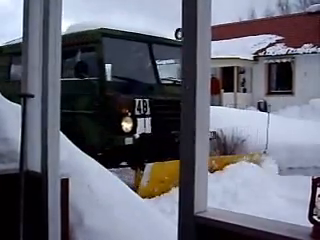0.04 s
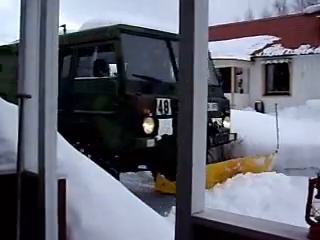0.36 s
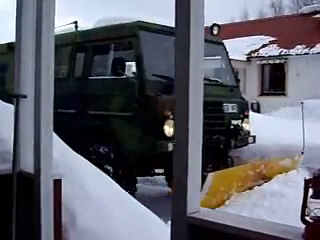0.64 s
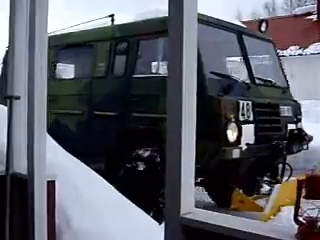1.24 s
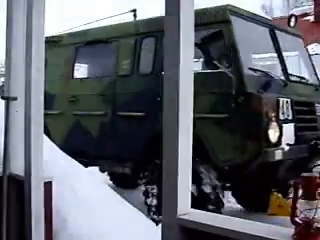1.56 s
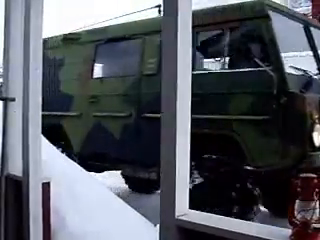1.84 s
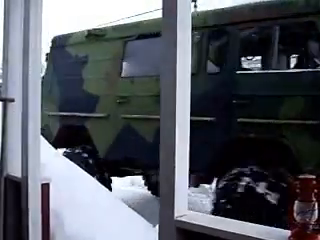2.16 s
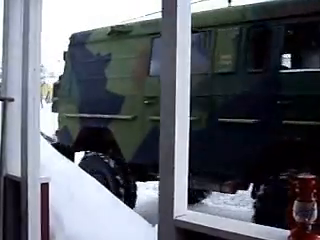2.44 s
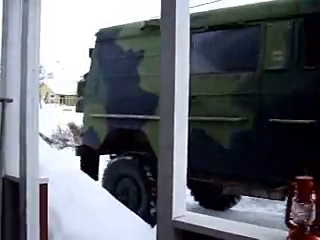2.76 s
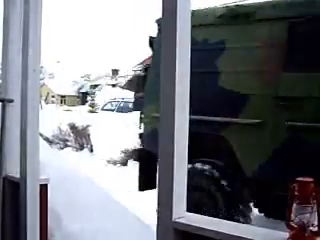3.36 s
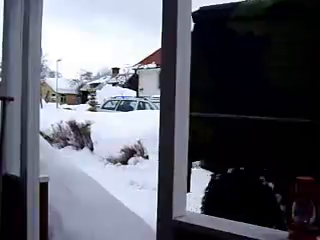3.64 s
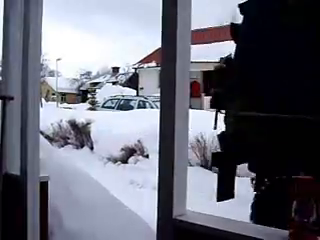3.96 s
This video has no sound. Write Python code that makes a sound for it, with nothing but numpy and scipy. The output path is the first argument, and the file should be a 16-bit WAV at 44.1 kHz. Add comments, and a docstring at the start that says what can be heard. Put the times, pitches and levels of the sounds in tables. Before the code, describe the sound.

A heavy truck plows past at walking pace, heard from a porch. Its steel blade scrapes, clanks and thumps over packed snow, then fades as the engine revs slightly and the exhaust drone grows, with light crunching.

```python
"""A steel blade judders and scrapes over packed snow, above the drone of a six-cylinder truck.
The truck ploughs past a porch at walking pace, revving up a little. The edge sticks and slips,
ringing the steel and jolting the chassis; snow and frozen lumps crunch under the tyres.
Then the blade moves away and the exhaust drone comes round.
A small camera with a low sample rate and a treble notch takes it in."""
import sys
import numpy as np
from scipy import signal
from scipy.fft import rfft, irfft
from scipy.io import wavfile
from scipy.ndimage import uniform_filter1d

SR = 44100
rng = np.random.default_rng(int(sys.argv[2]) if len(sys.argv) > 2 else 0)


def store_pcm(level_fs):
    """Save levels as 16-bit WAV."""
    pcm = np.round(np.clip(level_fs, -1, 1) * 32767).astype(np.int16)
    wavfile.write(sys.argv[1], SR, np.atleast_2d(pcm).T)


N = 176400
TIME_S = np.arange(N) / SR
FREQ_HZ = np.fft.rfftfreq(N, 1 / SR)
BURST_ATTACK_S, BURST_DECAY_S = 0.006, 0.018  # steel clashes and lumps


def undb(db):
    return 10 ** (np.asarray(db) / 20)


def unit(x):
    """Scale to rms 1."""
    return x / np.sqrt(np.mean(x ** 2))


def curve(table, column=1):
    """One table column, linear in time between rows."""
    rows = np.array(table, float)
    return np.interp(TIME_S, rows[:, 0], rows[:, column])


def colour(x, points):
    """Filter by (freq_hz, gain_db) points, falling off beyond both ends."""
    hz, db = np.array(points, float).T
    f = np.maximum(FREQ_HZ, 1)
    skirts = np.minimum(f / hz[0], 1) ** 2 * np.minimum(hz[-1] / f, 1) ** 2
    return irfft(rfft(x) * undb(np.interp(np.log(f), np.log(hz), db)) * skirts, N)


def resonance(x, hz, width_hz):
    """Band about hz, rms 1."""
    f = np.maximum(FREQ_HZ, 1)
    return unit(irfft(rfft(x) / (1 + 1j * (f / hz - hz / f) * hz / width_hz) ** 2, N))


def lowpass(x, hz):
    return signal.sosfilt(signal.ellip(8, 0.2, 70, hz, fs=SR, output="sos"), x)


def highpass(x, hz):
    return signal.sosfilt(signal.butter(2, hz, "high", fs=SR, output="sos"), x)


def wander(rate_hz):
    """Smooth random drift, rms 1."""
    hold = max(int(SR / rate_hz), 1)
    steps = np.repeat(rng.standard_normal(N // hold + 1), hold)
    return unit(uniform_filter1d(uniform_filter1d(steps, hold), hold)[:N])


def grains(per_s, spread_db=3):
    """Tiny fractures of random time, sign and size."""
    impulses = (rng.random(N) < per_s / SR) * rng.choice([-1, 1], N)
    return impulses * undb(spread_db * rng.standard_normal(N))


def porch(x, t60_s=0.078, tail_db=-13.0, delay_s=0.003):
    """Close wooden walls add a short tail."""
    t = TIME_S[:SR // 5]
    tail = rng.standard_normal(len(t)) * np.exp(-np.log(1000) * t / t60_s) * (t > delay_s)
    return x + undb(tail_db) * signal.fftconvolve(highpass(x, 600), tail / np.linalg.norm(tail))[:N]


def tyres():
    """Packed snow crunches under the tread."""
    # crunch spectrum: freq_hz, gain_db
    spectrum = [(800, -5), (2000, -37), (4300, 0), (5900, -13.5)]
    # crunch envelope: time_s, level_db
    levels = [(0, -36), (1.2, -67), (1.7, -40), (2.7, -39), (3.3, -38), (4, -42.5)]
    return unit(colour(grains(per_s=2300, spread_db=5.5), spectrum)) * undb(curve(levels))


def frozen_lumps():
    """Lumps give way under blade and wheels, each a burst of pitched grit."""
    # crushed lumps: start_s, length_s, centre_hz, level_db
    bursts = [(0.078, 0.038, 2560, -22.5), (0.563, 0.013, 2220, -24), (1.616, 0.18, 2130, -29),
              (1.711, 0.073, 1660, -26), (2.702, 0.016, 4170, -28.5), (2.738, 0.014, 2097, -26),
              (3.092, 0.0092, 2423, -26)]
    out = np.zeros(N)
    for start_s, length_s, centre_hz, level_db in bursts:
        age_s = np.maximum(TIME_S - start_s, 0)
        attack = np.minimum(age_s / BURST_ATTACK_S, 1)
        release = np.exp(-np.maximum(age_s - length_s, 0) / BURST_DECAY_S)
        grit = resonance(grains(per_s=1500), centre_hz, width_hz=0.25 * centre_hz)
        out += undb(level_db) * attack * release * grit
    return out


def body_rumble():
    """The heavy body shakes on rutted snow."""
    # body and road spectrum: freq_hz, gain_db
    spectrum = [(12, 10), (22, -39), (27, 8.5), (35, -1.5), (48, -6.5), (75, -4), (120, -3.5), (170, -4),
                (240, -12), (330, -16), (600, -65)]
    # rumble envelope: time_s, level_db
    levels = [(0, -18.5), (.25, -17), (.47, -20), (.68, -18.5), (1.75, -19.5), (2.25, -26), (2.45, -15.5),
              (2.95, -24.5), (3.25, -19), (3.45, -24), (3.58, -17.5), (3.95, -31)]
    return unit(colour(rng.standard_normal(N), spectrum)) * undb(curve(levels))


def machine_noise(firings, level_db=-28.5, pulse_depth=0.12):
    """Fan, valves and gas rush, pulsing with each firing."""
    # machine spectrum: freq_hz, gain_db
    spectrum = [(250, -9), (380, -6), (550, -1.5), (800, -11), (1200, -10), (2000, -10.5), (2800, -14),
                (4200, -14.5), (5900, -23)]
    rush = rng.standard_normal(N) * (1 + pulse_depth * np.cos(2 * np.pi * firings))
    return undb(level_db) * unit(colour(rush, spectrum))


def pipe_growl(firings, jitter_cycles=0.11, scatter_db=2.5, surge_db=2.5):
    """One uneven puff per firing rings the exhaust pipe; each resonance surges on its own."""
    # pipe resonances: centre_hz, gain_db
    modes = [(455, -5), (535, 0.5), (605, -4), (780, -7)]
    # growl envelope: time_s, level_db
    levels = [(0, -40.5), (2.3, -29.5), (2.5, -25), (2.9, -33.5), (3.35, -26), (3.47, -25.5), (3.72, -25.5),
              (4, -30.5)]
    count = np.floor(firings + jitter_cycles * wander(100))
    puffs = np.diff(count, prepend=count[0]) * undb(scatter_db * wander(100))
    pipe = sum(undb(db + surge_db * wander(18)) * resonance(puffs, hz, width_hz=64) for hz, db in modes)
    return undb(curve(levels)) * unit(pipe)


def exhaust_tone(cycles, waver_db=3.5):
    """Sine locked to the engine, wavering about rms 1."""
    return np.sqrt(2) * np.sin(2 * np.pi * (cycles + rng.random())) * undb(waver_db * wander(14))


def engine(jitter_cycles=0.023, tailpipe_db_per_s=4.5, tailpipe_round_s=3.03):
    """Firings drive drone, machine noise and growl; weak tones grow as the tailpipe comes round."""
    # exhaust drone: time_s, firing_hz, fundamental_db, octave_db
    revs = [(0, 79.25, -17, -44), (0.25, 80, -24, -36), (0.45, 80.7, -24, -51), (0.7, 81.67, -14.5, -56),
            (1.0, 82.1, -20, -31.5), (1.25, 89.5, -21.5, -31), (1.5, 92.9, -22, -29),
            (1.8, 92.25, -23, -31.5), (2.3, 93.85, -22, -27), (2.6, 97.35, -20, -22),
            (2.75, 95.85, -15, -27.5), (2.9, 95.85, -22.5, -23.5), (3.2, 97.7, -19.5, -23.5),
            (3.48, 98, -20.5, -20.5), (3.6, 99.15, -17, -19.5), (3.8, 99.2, -13, -22),
            (4.0, 99.1, -12.5, -25.5)]
    # lope of uneven cylinders: time_s, level_db
    lope_levels = [(0, -31), (.55, -32), (.7, -29), (1.9, -25.5), (2.6, -32.5), (3.3, -25.5), (4, -48)]
    # weak exhaust tones: firing_multiple, final_level_db
    partials = [(.5, -28), (3, -36), (4, -40.5)]
    firings = np.cumsum(curve(revs)) / SR + jitter_cycles * wander(24.94)
    fundamental = undb(curve(revs, column=2)) * exhaust_tone(firings, waver_db=0.67)
    octave = undb(curve(revs, column=3)) * exhaust_tone(2 * firings, waver_db=1.5)
    lope = undb(curve(lope_levels)) * exhaust_tone(1.5 * firings)
    facing = undb(tailpipe_db_per_s * np.minimum(TIME_S - tailpipe_round_s, 0))
    tailpipe = facing * sum(undb(db) * exhaust_tone(multiple * firings) for multiple, db in partials)
    return fundamental + octave + lope + tailpipe + machine_noise(firings) + pipe_growl(firings)


def stick_slip(chatter_hz=26.09, chatter_db=1.4):
    """Dense tiny slips of the edge, chattering irregularly; rms 1."""
    return unit(grains(per_s=4500) * undb(chatter_db * wander(chatter_hz)))


def steel(push, t60_s=0.16, ring_db=-7.5):
    """The blade answers a push with broad grinding and ringing modes, at the level of the push."""
    # grinding spectrum: freq_hz, gain_db
    spectrum = [(130, -3), (180, 11), (245, -0.5), (310, -9), (410, -15), (540, 3.5), (800, 4),
                (1250, -2.5), (1800, -10.5), (2600, -6), (3500, -26), (5900, -35)]
    # blade modes: pitch_hz, gain_db
    modes = [(735, -2), (829, 0), (985, 1), (1039, 8.5), (1125, 1), (1222, 0), (1281, -2.5), (1472, -7),
             (1615, -0.5), (1701, -4), (2056, -7), (2589, -2)]
    t = TIME_S[:SR // 2]
    ring = sum(undb(db) * np.sin(2 * np.pi * (hz * t + rng.random())) for hz, db in modes)
    ring *= np.exp(-np.log(1000) * t / t60_s)
    response = unit(colour(push, spectrum)) + undb(ring_db) * unit(signal.fftconvolve(push, ring)[:N])
    return unit(response) * np.std(push)


def jolts(thump_peak_s=0.0081, shudder_peak_s=0.043):
    """The blade catches: chassis thumps, plus envelopes for steel clash and panel shudder."""
    # blade catches: start_s, thump_db, thump_hz, clash_db
    catches = [(.174, -3.5, 73, -22), (.212, -4.5, 100.4, -14), (.229, -5, 119, -6), (0.253, -6, 115, -22),
               (0.302, -11, 215, -25), (.438, -12, 110, -26), (.568, -8.5, 101, -6), (.634, -8.5, 72, -22),
               (.682, -8.5, 101, -21), (.73, -14, 90, -12), (.802, -9.5, 69, -16), (1.142, -17, 110, -15.5),
               (1.765, -11, 70, -32), (2.016, -7.5, 75, -17), (2.412, -9, 89.6, -21), (3.548, -12, 96, -18)]
    thumps, clash_env, shudder_env = np.zeros((3, N))
    for start_s, thump_db, thump_hz, clash_db in catches:
        age_s = np.maximum(TIME_S - start_s, 0)
        swell = (age_s / thump_peak_s) ** 2 * np.exp(2 - 2 * age_s / thump_peak_s)
        thumps -= undb(thump_db) * swell * np.sin(2 * np.pi * thump_hz * age_s)
        attack = 1 - np.exp(-age_s / BURST_ATTACK_S)
        clash_env += undb(clash_db) * attack * np.exp(-age_s / BURST_DECAY_S)
        shake = age_s / shudder_peak_s * np.exp(1 - age_s / shudder_peak_s)
        shudder_env = np.hypot(shudder_env, undb(thump_db) * shake)
    return thumps, clash_env, shudder_env


def plough(spray_db=-10, shudder_db=-16.5):
    """The slipping edge grinds and shears snow; jolts add clashes, snow spray and panel shudder."""
    # scrape envelopes: time_s, grind_db, shear_db
    levels = [(0, -23, -32), (.05, -27, -19), (.11, -21, -19.5), (.14, -18, -24), (.23, -15.5, -22),
              (.31, -15.5, -19), (.36, -20.5, -22.5), (.44, -23, -23), (.5, -24, -25), (.56, -20.5, -24.5),
              (.62, -21, -21.5), (.65, -13, -27), (.75, -19, -23.5), (.815, -19, -20.5), (.835, -23.5, -29),
              (.88, -21.5, -23.5), (1.05, -18, -24.5), (1.25, -23, -28.5), (1.47, -25.5, -26.5),
              (1.65, -22, -21.5), (1.8, -23.5, -22.5), (1.93, -27.5, -32), (2.02, -25, -27),
              (2.15, -28, -30.5), (2.37, -29.5, -28), (2.47, -23, -26), (2.7, -27, -27), (2.77, -24, -26),
              (2.86, -28.5, -31.5), (3.35, -27, -27.5), (3.48, -34, -28.5), (3.6, -28.5, -24.5),
              (3.75, -30, -33), (4, -35, -37)]
    # shearing snow spectrum: freq_hz, gain_db
    spectrum = [(500, -16), (1000, 0), (1600, 2), (2100, 1.5), (2600, -1.5), (3100, -4.5), (4200, -12),
                (5900, -17)]
    thumps, clash_env, shudder_env = jolts()
    grind_env = np.hypot(undb(curve(levels)), clash_env)
    shear_env = np.hypot(undb(curve(levels, column=2)), undb(spray_db) * clash_env)
    grinding = steel(stick_slip() * grind_env)
    shearing = unit(colour(stick_slip(), spectrum)) * shear_env
    shudder = undb(shudder_db) * shudder_env * resonance(stick_slip(), hz=217, width_hz=79)
    return thumps + shudder + grinding + shearing


def scene():
    return porch(engine() + body_rumble() + plough() + tyres() + frozen_lumps())[None]


def record(dry, rate_hz=12000, notch_hz=3745, notch_width_hz=462, top_hz=12600):
    """The camera notches the treble, cuts at half its rate, mirrors the band upward and limits peaks."""
    # faint image above half the sample rate: freq_hz, gain_db
    image_spectrum = [(6000, -47), (6400, -13.5), (8300, -17), (9500, -22), (10300, -25), (11500, -30),
                      (12500, -32.5)]
    notch = 1 - np.exp(-np.abs(2 * (FREQ_HZ - notch_hz) / notch_width_hz) ** 4)
    band = lowpass(irfft(rfft(dry[0]) * notch, N), rate_hz / 2)
    carrier = 2 * np.cos(2 * np.pi * rate_hz * TIME_S)
    image = colour(highpass(band, 500) * carrier, image_spectrum)
    return lowpass(np.clip(band + image, -1, 1), top_hz)[None]


dry = scene()
out = record(dry)
store_pcm(out)
```